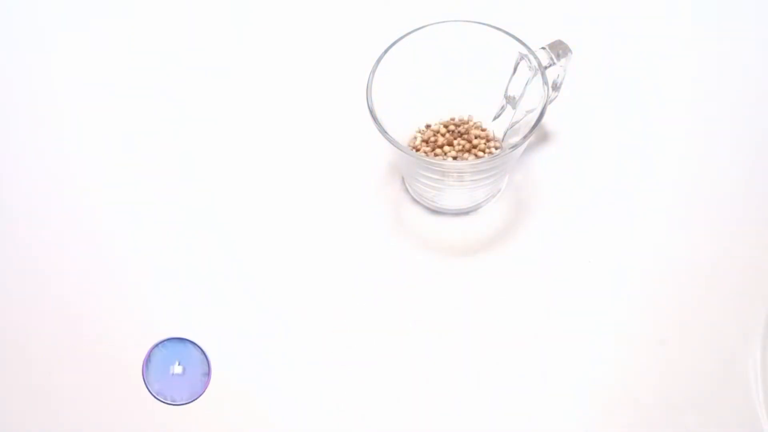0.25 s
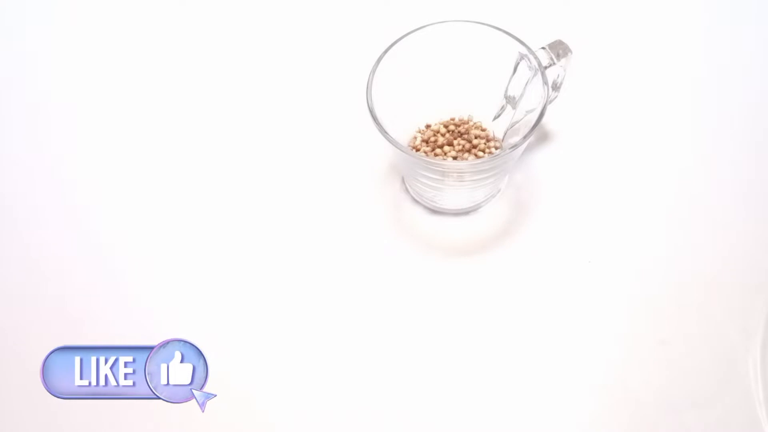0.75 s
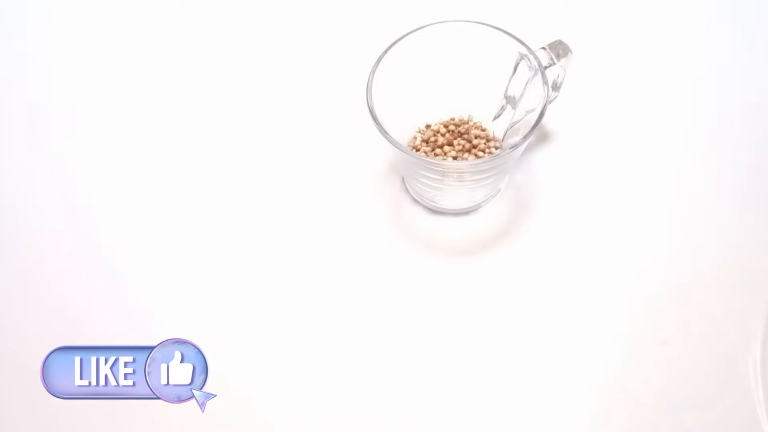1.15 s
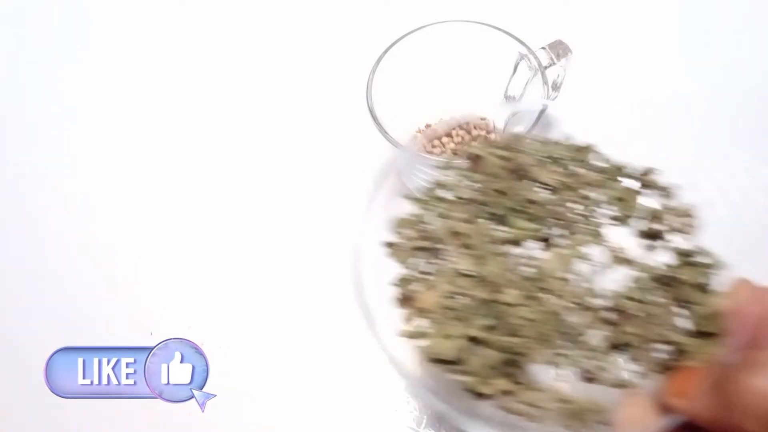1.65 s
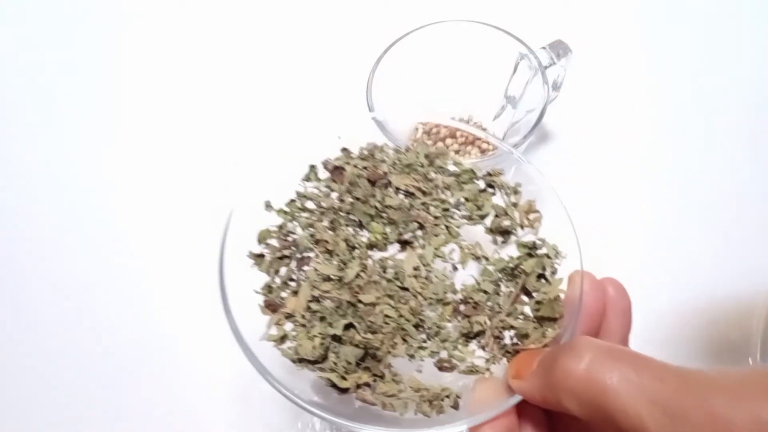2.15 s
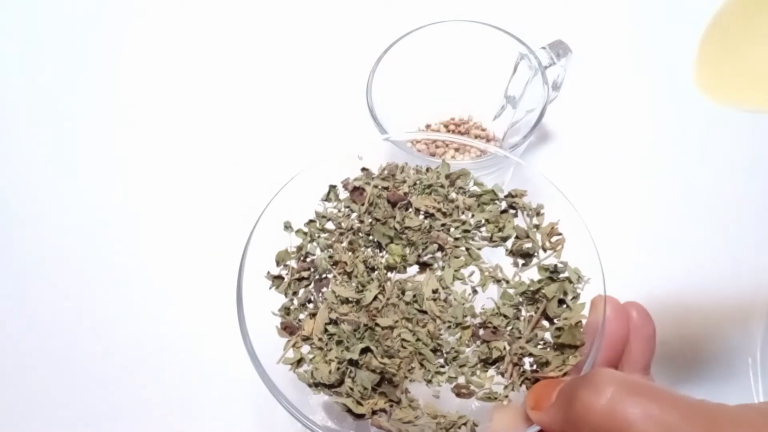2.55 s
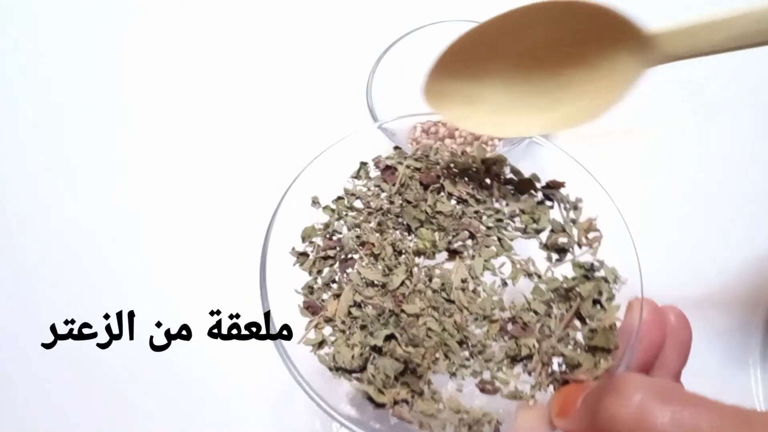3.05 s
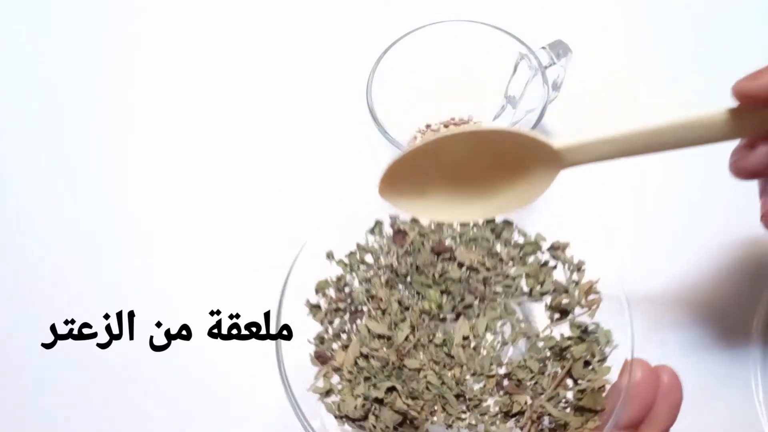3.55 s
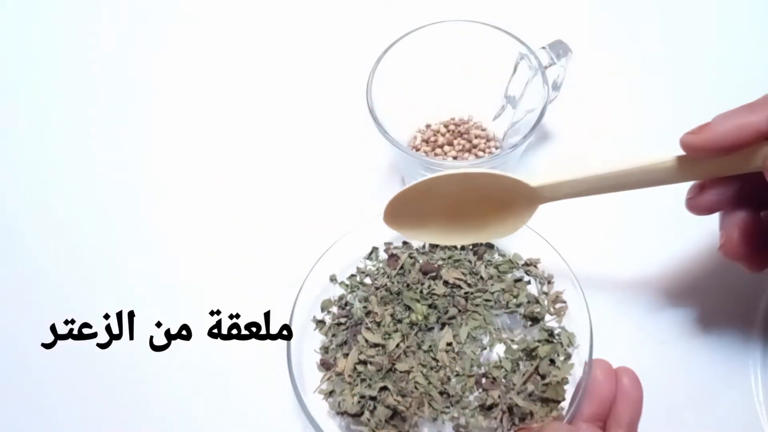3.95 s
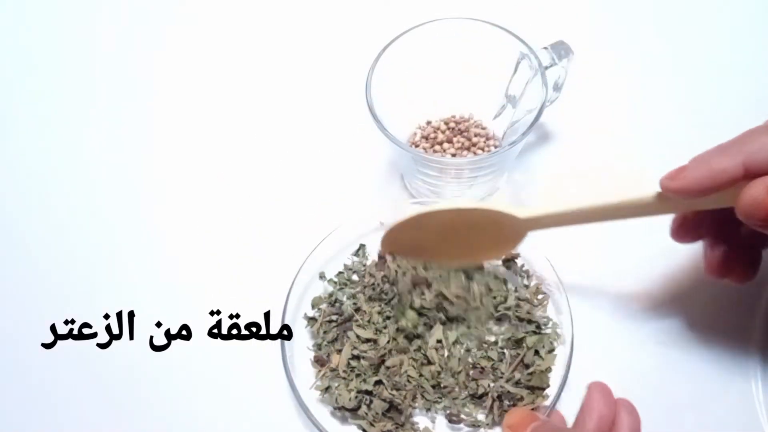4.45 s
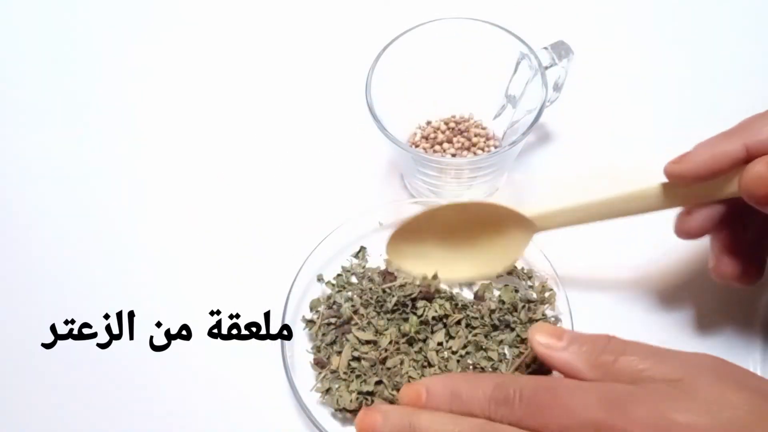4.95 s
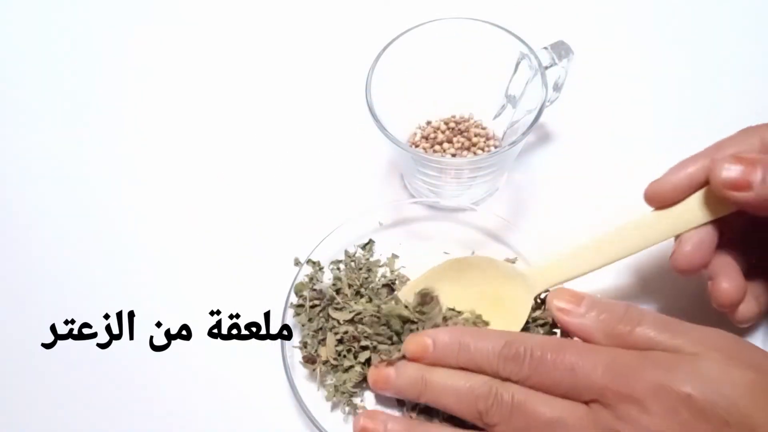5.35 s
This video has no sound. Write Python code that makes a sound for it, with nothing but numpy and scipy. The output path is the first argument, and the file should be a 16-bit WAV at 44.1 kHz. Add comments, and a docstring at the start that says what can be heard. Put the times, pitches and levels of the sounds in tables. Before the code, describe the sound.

Close stereo pickup in a small quiet room with low hum and thin hiss. Faint glass chatter and small ticks come first, then a hard clink of saucer against cup. After a pause, the saucer lands on the table with a loud, woody, ringing knock. Small taps follow, then brief crackly scrunches as spoon and fingers push dried herbs.

```python
"""A glass saucer of dried herbs chatters as it is lifted, clinks against a glass cup and is set down on a table.
Saucer, cup and table ring in decaying modes at each blow; every contact adds a short burst of band noise.
A wooden spoon and fingers stir the leaves: random cracks under rising and falling gains, and faint slides.
A small room adds a diffuse tail; low hum and thin hiss lie beneath. A close pair of microphones hears it."""
import sys
import numpy as np
from scipy import signal
from scipy.fft import rfft, irfft
from scipy.io import wavfile

SR = 44100
rng = np.random.default_rng(int(sys.argv[2]) if len(sys.argv) > 2 else 0)


def unload_wav(signal):
    """Save mono or channel-first audio to the path in sys.argv[1] as 16-bit WAV at rate SR, clipped to [-1, 1]."""
    wavfile.write(
        sys.argv[1],
        SR,
        np.round(np.clip(np.atleast_2d(signal).T, -1, 1) * 32767).astype(np.int16),
    )


N = 246959

# Background spectra. Each row: frequency in Hz, relative level in dB.
HUM_SPECTRUM = [(20, -51), (40, -20.5), (55, -6.5), (75, -4.5), (105, -14.5), (145, -10), (210, -7.5),
                (275, 1), (350, -7), (430, -12), (550, -13.5), (750, -23), (1000, -35.5), (1600, -42.5),
                (3000, -93)]
HISS_SPECTRUM = [(300, -18), (1000, -4), (2500, -3), (3400, -9), (6000, -12), (9500, -8.5), (12000, -15.5),
                 (16000, -18)]
HUM_RMS_DB, HISS_RMS_DB = -60.5, -73.5
# Likeness of the background in the two microphones. Each row: frequency in Hz, correlation from -1 to 1.
BACKGROUND_LIKENESS = [(60, 0.77), (180, 0.66), (550, 0.37), (1650, -0.48), (4970, -0.04), (15000, -0.04)]

# Decay of the room. Each row: frequency in Hz, t60 in seconds.
ROOM_DECAY = [(100, 0.26), (500, 0.5905), (2000, .46), (5000, 0.48), (8000, .36), (14000, 0.31)]
# Strength of the room tail. Each row: frequency in Hz, level in dB.
ROOM_LEVEL = [(100, -5), (250, -4.5), (500, -1.5), (1000, -13), (2000, -8.5), (4000, -10), (8000, -8.5),
              (10500, -16.5), (14000, -16.5)]

# Spectra of the cracking leaves and of the slides. Each row: frequency in Hz, relative level in dB.
LEAF_SPECTRUM = [(1470, -45), (2500, -14.5), (3410, -12), (6550, -9.5), (7080, -6.5), (9660, 1),
                 (15200, -11.5), (16000, -17)]
BRUSH_SPECTRUM = [(30, -20.5), (70, 9.5), (150, 0), (300, -7), (900, 1), (2400, 0), (5000, -6.5),
                  (9500, -4.5), (13000, -11.5), (16000, -17.5)]
# Pushes that shift the leaves. Each row: start of the hold in seconds, level in dB, hold in seconds,
# fall in dB per second, opening crack in dB.
LEAF_PUSHES = [(.497, -66, .075, 150, -66), (4.53, -67.5, 0.13, 170, -66),
               (5.1057, -57.8, 0.054, 74, -49.5), (5.268, -57.8, 0.027, 75, -51),
               (5.4986, -59.8, .09, 90, -47.5)]
# Slow movements of saucer and spoon. Each row: loudest time in seconds, level in dB, fall in dB per second.
SLIDES = [(.68, -67.5, 10.5), (2.95, -72.5, 34), (3.62, -77, 40), (4.55, -71, 48), (5.25, -76, 25)]
PUSH_RISE_DB_PER_S, SLIDE_RISE_DB_PER_S = 700, 35

# Ringing modes of the table top, cup wall, cup rim, saucer body (damped by hand and leaves) and saucer's
# free rim. Each row: frequency in Hz, relative level in dB, t60 in seconds, left-right difference in dB.
TABLE_MODES = [(144.3, -9, 0.12, 0.5), (163.4, -15.5, .18, 1), (190.5, -2, 0.15, 1),
               (201.5, -11, 0.22, 1.5), (222.4, -1.5, 0.16, 0.5), (278.9, -11, 0.44, -0.5),
               (300.4, -7, 0.18, 0.5), (329, -13.5, .1, 0), (461, -21.5, 0.11, 3), (589, -15.5, 0.11, 4.5),
               (641, -18, 0.16, 2.5), (742, -12.5, 0.079, 0.5), (774, -22, .14, 4.5)]
CUP_WALL_MODES = [(1580, -11, 0.024, 1.5), (1834, -13, .025, 3.5), (2820, -18, .03, 0),
                  (3534, -5, .036, -3), (4020, -13.5, .03, -1), (4550, -9.5, 0.027, 5),
                  (4670, -2.5, 0.043, 6.5), (4893, -16.5, .05, 1), (5500, -9, 0.054, 1.5),
                  (5560, -4, .05, 3), (6740, -9.5, 0.072, 9), (7930, -17, 0.1136, -2),
                  (7960, -17.5, 0.086, -3), (9502, -10, .05, 9), (10330, 0.5, 0.025, 6),
                  (10480, -8, .025, 2.5), (13540, -14, .035, 10.5), (13850, -15, .035, 11.5)]
CUP_RIM_MODES = [(2106, 0.5, .42, 1.5), (4660, -2.5, 0.5, -2), (8000, -20.5, 0.38, -1.5)]
SAUCER_BODY_MODES = [(1648, -2, 0.072, 7), (2425, -10.5, 0.057, -9), (3488, -5, 0.051, 0),
                     (4737, -12.5, 0.16, -7), (4860, -17, 0.06, -13), (5560, 2.5, 0.024, 2),
                     (6860, -3, 0.047, 4), (7703, -14, .04, -3), (9526, 3, 0.049, 3.5),
                     (10130, -14.5, 0.065, 7), (13300, -8, 0.048, 8)]
SAUCER_RIM_MODES = [(2439, 2, 0.39, 1.5), (3470, -13.5, 0.35, -0.5), (4920, -26.5, .35, 1.5),
                    (4890, -28.5, .3, -1.5), (10500, -24.5, .22, 3)]

# Knocks on the table. Each row: start in seconds, level in dB, highest frequency the contact reaches in Hz.
TABLE_KNOCKS = [(2.369, -38.5, 2500), (4.2388, -20, 1970), (4.589, -42, 270), (4.998, -44, 1150),
                (5.222, -52.5, 298)]
# Saucer meets cup. Each row: start in seconds, wall level in dB, wall tilt in dB per octave,
# rim level in dB, rim tilt in dB per octave, clack level in dB.
CUP_CLINKS = [(2.3681, -19.5, 1, -58, 16.5, -23), (4.2416, -38.5, -1, -63, -6, -24.5),
              (4.7935, -70, -2, -65, -10, -47.5)]
# Blows that ring the saucer, and one faint glassy touch near 4.73 s. Each row: start in seconds, level in dB,
# tilt in dB per octave.
SAUCER_HITS = [(.419, -69.5, 11.5), (2.3685, -51, -4), (4.1861, -36, 1), (4.2059, -55.5, -6),
               (4.24236, -45.5, -1), (4.25588, -48.5, -2.5), (4.364, -68.5, 10), (4.7263, -73, 6),
               (4.7945, -71.5, -9.5), (4.9998, -61.5, -7)]

# Evenly spaced, growing taps as the saucer is lifted.
CHATTER_START_S, CHATTER_GAP_S = .196, .0185
CHATTER_START_DB, CHATTER_GROWTH_DB_PER_TAP, CHATTER_TILT_DB_PER_OCT = -74.5, 1.1, 8.5

# The saucer's rim takes blows more strongly and brightly than its body; the hand weakens it outside the free span.
RIM_GAIN_DB, RIM_EXTRA_TILT_DB_PER_OCT = 3, 3.2
RIM_FREE_FROM_S, RIM_FREE_UNTIL_S, RIM_GRIP_DB = 4.2, 4.95, -22

# Dry noise by kind of contact. Each: centre in Hz, width in octaves, t60 in seconds, left-right difference in dB.
CUP_TICK_NOISE = (3800, 0.9, 0.02, -1)
SAUCER_TICK_NOISE = (1700, 1.4, .0072, 4)
CLACK_NOISE = (580, 1.62, 0.01, -1)
REBOUND_NOISE = (750, 1.9, 0.004, -3)
THUD_NOISE = (620, 1.2, .01, 2.5)
STEM_CRACK_NOISE = (10400, 0.58, .019, 7.1)
# Noise relative to its blow; a thud gains with each octave that the contact reaches higher.
CUP_TICK_REL_DB, SAUCER_TICK_REL_DB, THUD_REL_DB, THUD_HARDNESS_DB_PER_OCT = -2.5, 2, -10.5, 5.5
REBOUND_DELAY_S, REBOUND_REL_DB = .007, -10  # second, weaker touch of each clink
# Small dry ticks and crisp cracks of stems. Each row: start in seconds, onset level in dB, centre in Hz, width
# in octaves, # t60 in seconds, left-right difference in dB.
DRY_TICKS = [(.4931, -39.5, 5400, 0.87, .0087, -5), (.549, -47.5, 8140, 0.34, .029, -11),
             (3.419, -52.5, 9940, .55, 0.069, -4.5), (4.076, -61.5, 1490, .44, .014, 0),
             (4.4308, -44.5, 9800, .52, .012, -8), (4.9945, -58.5, 9050, .62, 0.02, 3)]

SOFTEN_HZ, BAND_LIMIT_HZ = 13700, 16300


def amp(db):
    """Decibels to gain."""
    return 10 ** (np.asarray(db) / 20)


def unit(x):
    """Scales to rms 1."""
    return x / np.sqrt(np.mean(x ** 2) + 1e-20)


def read(points, hz):
    """Interpolates a curve on a log-frequency axis."""
    point_hz, value = np.transpose(points)
    return np.interp(np.log(hz + 1), np.log(point_hz + 1), value)


def colour(x, spectrum):
    """Filters x by a spectrum, at rms 1."""
    gain = amp(read(spectrum, np.fft.rfftfreq(N, 1 / SR)))
    return unit(irfft(rfft(x) * gain, N))


def swell(peak_s, db, rise_db_per_s, hold_s, fall_db_per_s):
    """Gain that rises to its level at peak_s, holds and dies away, linearly in dB."""
    t = np.arange(N) / SR - peak_s
    rise_db = rise_db_per_s * np.maximum(-t, 0)
    fall_db = fall_db_per_s * np.maximum(t - hold_s, 0)
    return amp(db - rise_db - fall_db)


def low_cut(x, edge_hz, order):
    """Removes the bass below an edge."""
    return signal.sosfilt(signal.butter(order, edge_hz, "high", fs=SR, output="sos"), x)


def add(mix, start_s, sound):
    """Adds a stereo sound in place, cut at the end of the mix."""
    part = mix[:, round(start_s * SR):][:, :sound.shape[1]]
    part += sound[:, :part.shape[1]]


def strike(modes, blows, pivot_hz, spread_rad):
    """An object rings in decaying sine modes at each blow; a blow's tilt weights them about the pivot."""
    hz, mode_db, t60_s, pan_db = np.transpose(modes)
    t, out = np.arange(SR) / SR, np.zeros((2, N))
    # each mode meets the two microphones with its own level and phase
    side = np.array([.5, -.5])[:, None]
    phase = side * spread_rad * rng.choice([-1, 1], len(hz))
    decay = np.exp(-np.log(1000) * t / t60_s[:, None])
    rings = np.sin(2 * np.pi * hz[:, None] * t + phase[..., None]) * decay
    for start_s, blow_db, tilt_db in blows:
        gains = amp(mode_db + blow_db + tilt_db * np.log2(hz / pivot_hz) + side * pan_db)
        add(out, start_s, np.einsum("cm,cmt->ct", gains, rings))
    return out


def background():
    """Low room hum and thin hiss: one noise pair, correlated by frequency, in two spectra."""
    same = read(BACKGROUND_LIKENESS, np.fft.rfftfreq(N, 1 / SR))
    a, b = rfft(rng.standard_normal((2, N)))
    noise = irfft([a, same * a + np.sqrt(1 - same ** 2) * b], N)
    hum = amp(HUM_RMS_DB) * colour(noise, HUM_SPECTRUM)
    hiss = amp(HISS_RMS_DB) * colour(noise, HISS_SPECTRUM)
    return hum + hiss


def room(x, delay_s=0.0045, build_s=0.0065, mono_hz=700):
    """A diffuse noise tail sets in after a delay, builds up and decays at a rate set by frequency."""
    hz, t, z = signal.stft(rng.standard_normal((2, SR)), SR, nperseg=256)
    same = np.exp(-(hz / mono_hz) ** 2 / 2)[:, None]  # long waves reach both microphones alike
    z = np.array([z[0], same * z[0] + np.sqrt(1 - same ** 2) * z[1]])
    rate = np.log(1000) / read(ROOM_DECAY, hz)[:, None]
    level = amp(read(ROOM_LEVEL, hz))[:, None] * np.sqrt(2 * rate / SR)  # root: unit energy before level
    tail = signal.istft(z * level * np.exp(-rate * t), SR, nperseg=256)[1][:, :SR]
    tail = tail * np.clip((np.arange(SR) / SR - delay_s) / build_s, 0, 1)
    return signal.fftconvolve(x, tail, axes=1)[:, :N]


def brushing(pan_db=-3):
    """Slow movements slide faintly and smoothly: coloured noise, off to one side."""
    swells = [swell(s, db, SLIDE_RISE_DB_PER_S, 0, fall) for s, db, fall in SLIDES]
    noise = colour(rng.standard_normal((2, N)), BRUSH_SPECTRUM)
    return noise * np.max(swells, axis=0) * amp([[pan_db / 2], [-pan_db / 2]])


def leaves(cracks_per_s=2500, size_db=4.0, bleed=0.11):
    """Dry leaves break and rub in countless random cracks, a few of them larger."""
    cracks = (rng.random((2, N)) < cracks_per_s / SR) * rng.choice([-1, 1], (2, N))
    cracks = cracks * amp(size_db * np.minimum(rng.exponential(1, (2, N)), 4))
    pushes = [swell(s, db, PUSH_RISE_DB_PER_S, hold, fall) for s, db, hold, fall, _ in LEAF_PUSHES]
    return colour(cracks + bleed * cracks[::-1], LEAF_SPECTRUM) * np.max(pushes, axis=0)


def table_knocks(radiates_hz=122):
    """The table booms; a soft, slow contact cannot reach its upper modes."""
    out = np.zeros((2, N))
    for start_s, db, contact_hz in TABLE_KNOCKS:
        boom = strike(TABLE_MODES, [(start_s, db, 0)], pivot_hz=190, spread_rad=.1)
        out += signal.sosfilt(signal.butter(2, contact_hz, fs=SR, output="sos"), boom)
    # a board radiates little below its lowest modes
    return low_cut(out, edge_hz=radiates_hz, order=3)


def contacts():
    """Lists the dry noise of clinks, saucer hits, knocks, pushes and lone ticks and cracks, in DRY_TICKS
    columns."""
    rows = []
    for s, wall_db, _, _, _, clack_db in CUP_CLINKS:
        rows.append((s, wall_db + CUP_TICK_REL_DB, *CUP_TICK_NOISE))
        rows.append((s, clack_db, *CLACK_NOISE))
        rows.append((s + REBOUND_DELAY_S, wall_db + REBOUND_REL_DB, *REBOUND_NOISE))
    for s, db, _ in SAUCER_HITS:
        rows.append((s, db + SAUCER_TICK_REL_DB, *SAUCER_TICK_NOISE))
    for s, db, contact_hz in TABLE_KNOCKS:
        hardness_db = THUD_HARDNESS_DB_PER_OCT * np.log2(contact_hz / THUD_NOISE[0])
        rows.append((s, db + THUD_REL_DB + hardness_db, *THUD_NOISE))
    for s, _, _, _, crack_db in LEAF_PUSHES:
        rows.append((s, crack_db, *STEM_CRACK_NOISE))
    return rows + DRY_TICKS


def contact_noise(shared=0.63, size=4096):
    """Each contact is a decaying burst of noise in one broad band, partly shared by the microphones."""
    t, hz, out = np.arange(size) / SR, np.fft.rfftfreq(size, 1 / SR), np.zeros((2, N))
    for start_s, db, centre_hz, octaves, t60_s, pan_db in contacts():
        common, separate = rng.standard_normal(size), rng.standard_normal((2, size))
        noise = np.sqrt(shared) * common + np.sqrt(1 - shared) * separate
        band = np.exp(-.5 * (np.log2((hz + 1) / centre_hz) / octaves) ** 2)
        decay = np.exp(-np.log(1000) * t / t60_s)
        burst = unit(irfft(rfft(noise) * band) * decay) * np.sqrt(np.mean(decay ** 2))
        add(out, start_s, burst * amp([[db + pan_db / 2], [db - pan_db / 2]]))
    return low_cut(out, edge_hz=140, order=2)


def cup():
    """Each clink rings the cup's wall briefly and its rim for longer."""
    wall_blows = [(s, db, tilt) for s, db, tilt, _, _, _ in CUP_CLINKS]
    rim_blows = [(s, db, tilt) for s, _, _, db, tilt, _ in CUP_CLINKS]
    wall = strike(CUP_WALL_MODES, wall_blows, pivot_hz=5500, spread_rad=1.7)
    rim = strike(CUP_RIM_MODES, rim_blows, pivot_hz=2140, spread_rad=0.98)
    return wall, rim


def chatter(count):
    """Taps of the saucer as it is lifted, in SAUCER_HITS columns."""
    return [(CHATTER_START_S + k * CHATTER_GAP_S, CHATTER_START_DB + k * CHATTER_GROWTH_DB_PER_TAP,
             CHATTER_TILT_DB_PER_OCT) for k in range(count)]


def saucer():
    """The same blows ring the saucer's body and, as far as the hand allows, its rim."""
    body_blows = chatter(count=4) + SAUCER_HITS
    rim_blows = []
    for s, db, tilt in body_blows:
        grip_db = 0 if RIM_FREE_FROM_S < s < RIM_FREE_UNTIL_S else RIM_GRIP_DB
        rim_blows.append((s, db + RIM_GAIN_DB + grip_db, tilt + RIM_EXTRA_TILT_DB_PER_OCT))
    body = strike(SAUCER_BODY_MODES, body_blows, pivot_hz=5430, spread_rad=1.0)
    rim = strike(SAUCER_RIM_MODES, rim_blows, pivot_hz=5400, spread_rad=.3)
    return body, rim


def scene():
    """Glass, table and herbs in the room; the rims feed the room less."""
    cup_wall, cup_rim = cup()
    saucer_body, saucer_rim = saucer()
    rims = cup_rim + saucer_rim
    near = cup_wall + saucer_body + table_knocks() + contact_noise() + leaves() + brushing()
    return near + rims + room(near + amp(-6.5) * rims) + background()


def record(dry):
    """The microphones soften the highest treble; then a steep band limit."""
    soft = signal.sosfilt(signal.butter(4, SOFTEN_HZ, fs=SR, output="sos"), dry)
    band_limit = signal.firwin(401, BAND_LIMIT_HZ, window=("kaiser", 9), fs=SR)
    return signal.oaconvolve(soft, band_limit[None], "same")


dry = scene()
out = record(dry)
unload_wav(out)
```